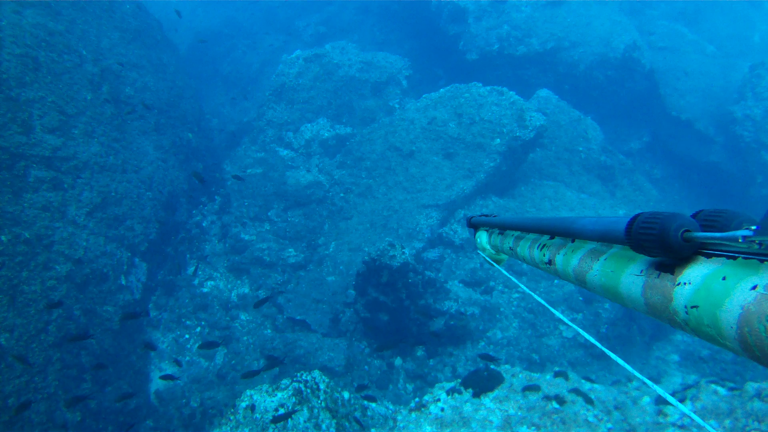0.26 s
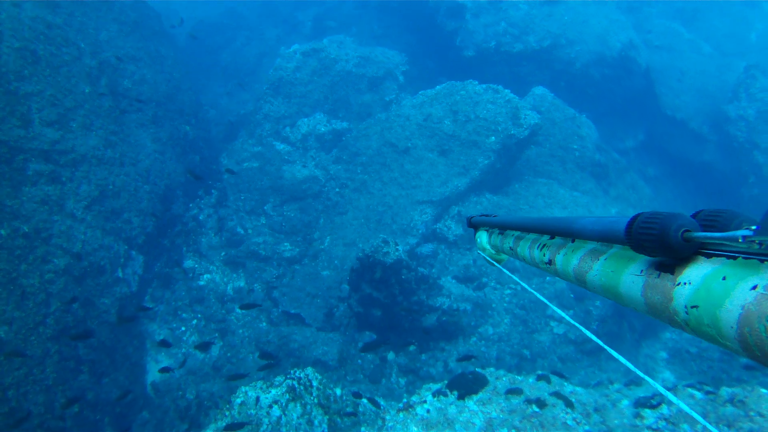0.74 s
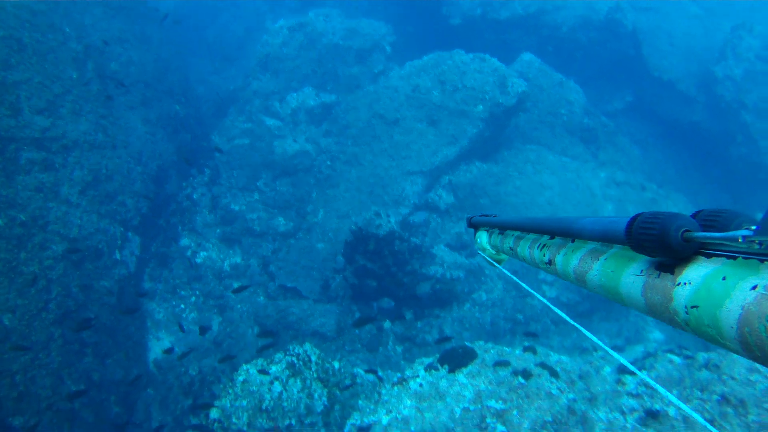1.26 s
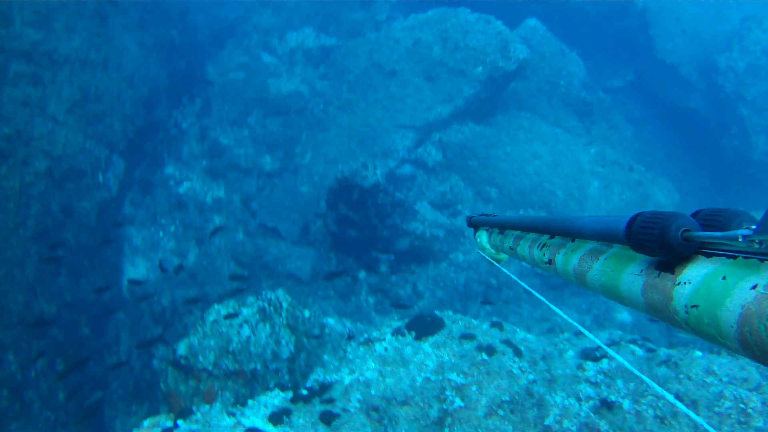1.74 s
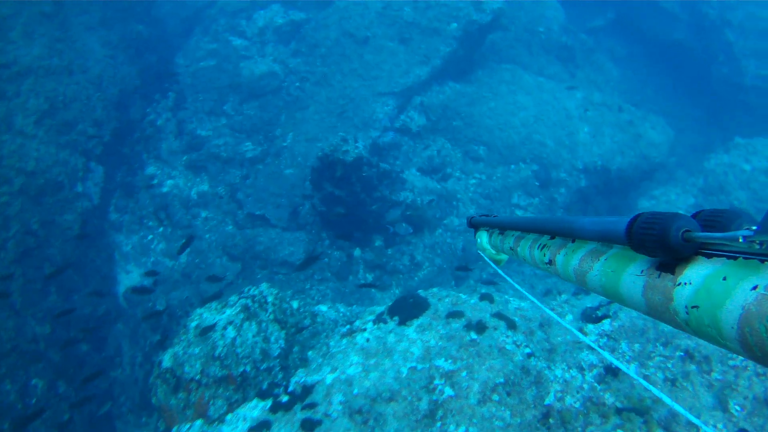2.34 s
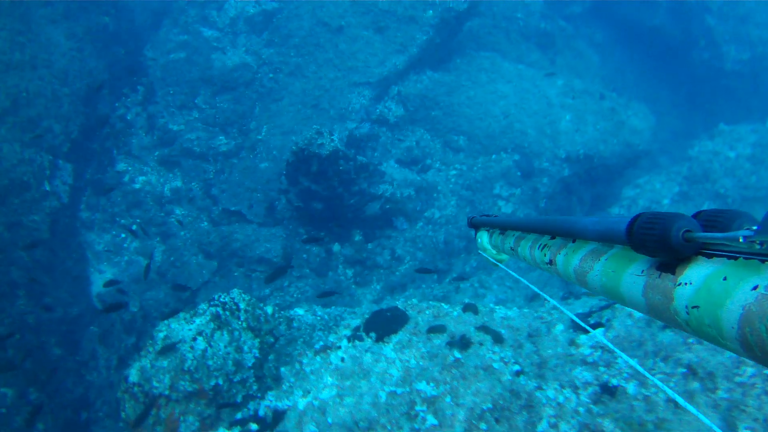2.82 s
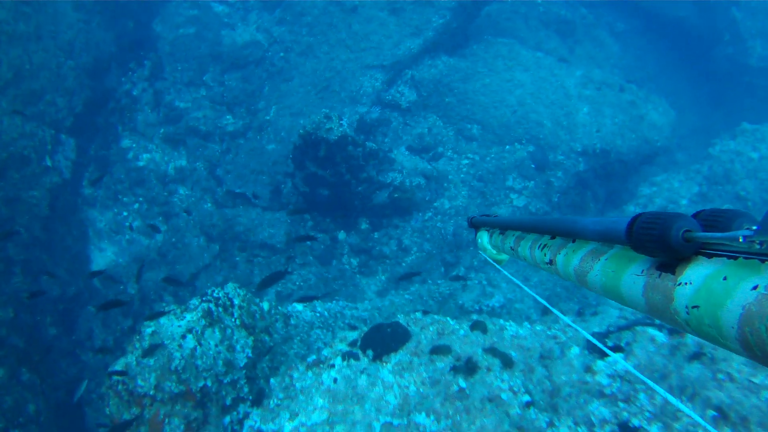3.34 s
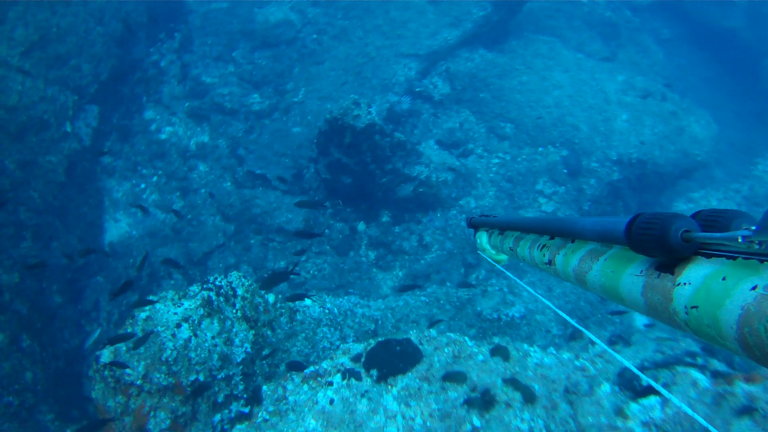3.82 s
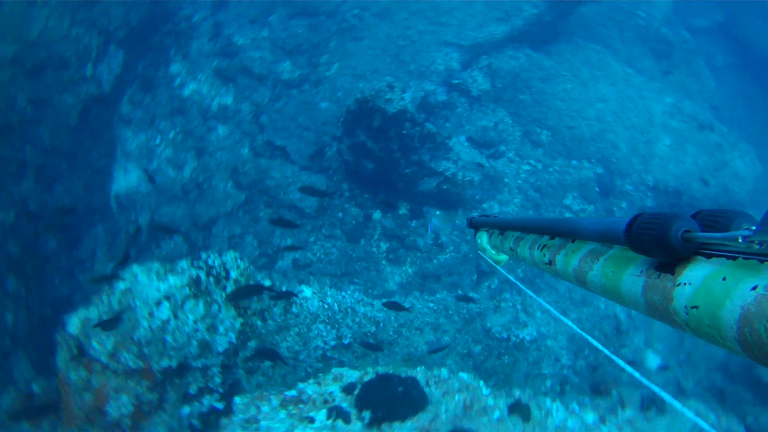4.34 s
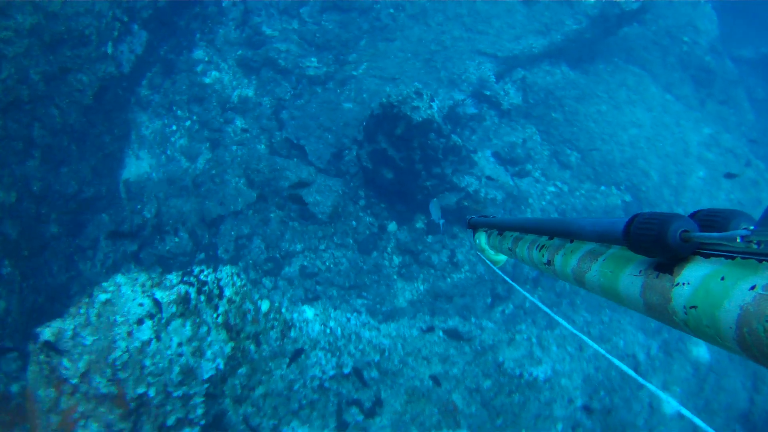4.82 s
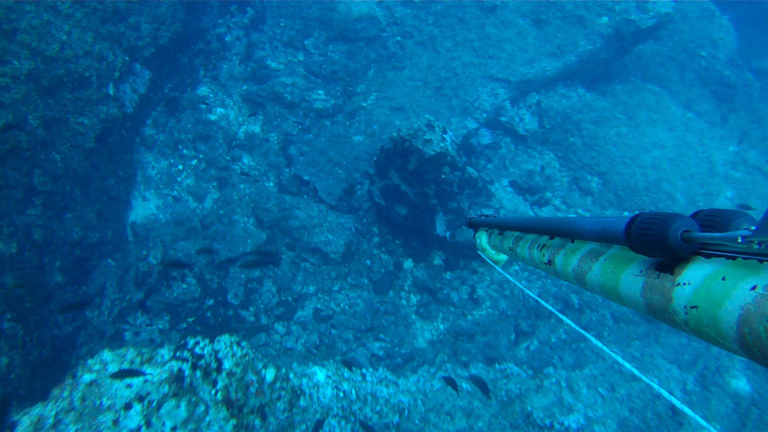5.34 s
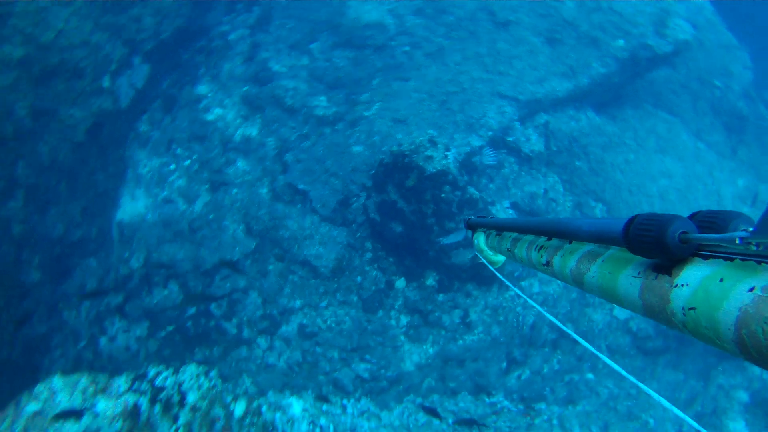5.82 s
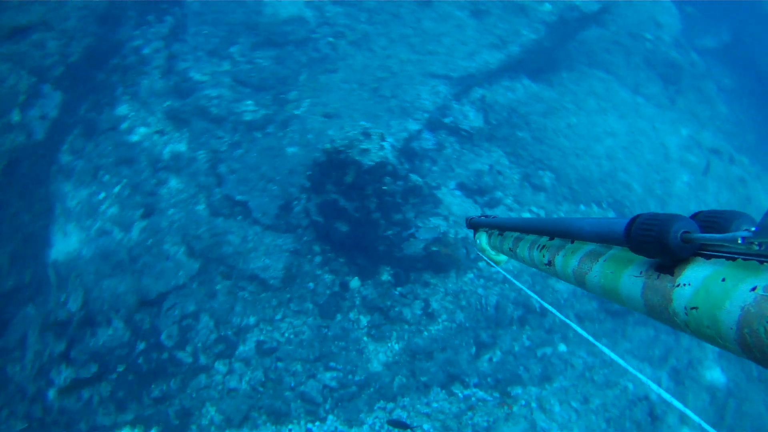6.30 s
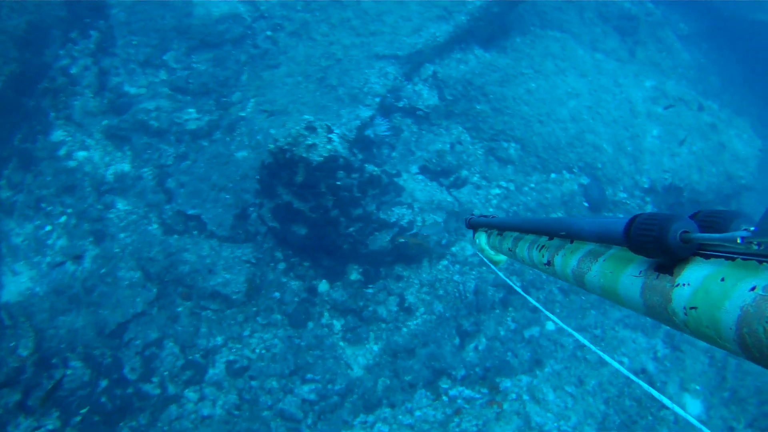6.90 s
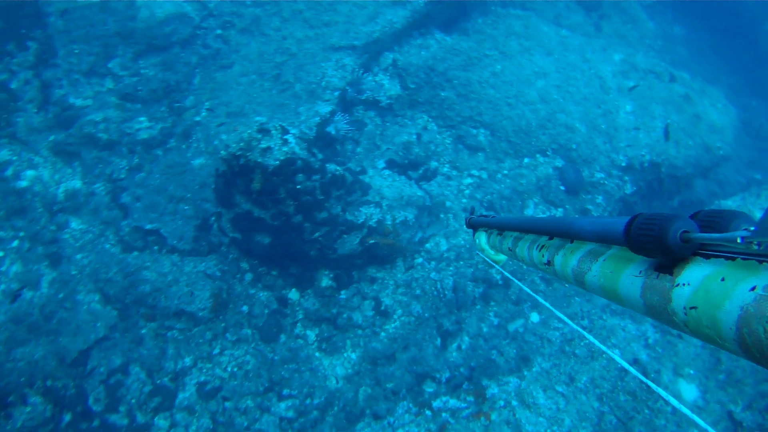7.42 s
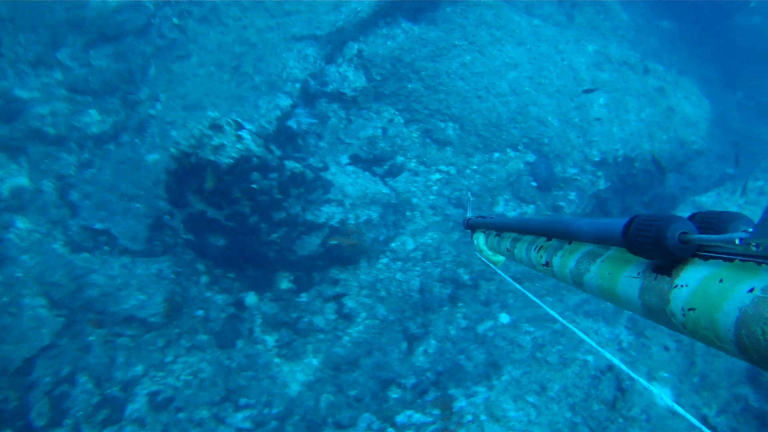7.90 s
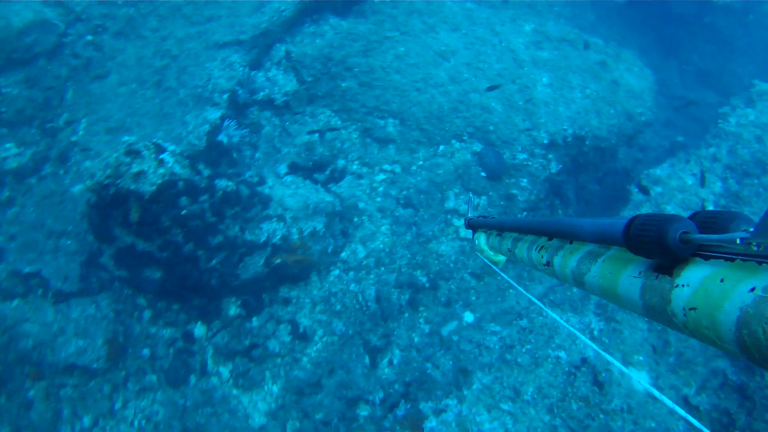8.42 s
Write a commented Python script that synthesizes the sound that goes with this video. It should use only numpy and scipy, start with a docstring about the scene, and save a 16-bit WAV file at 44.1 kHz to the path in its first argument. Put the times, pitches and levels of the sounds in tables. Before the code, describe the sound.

Underwater by a rocky reef, heard through a camera's sealed housing: faint hiss, midrange wash, soft rumble and constant fine shrimp crackle. Sharp near snaps tick irregularly, with a strong one half a second in. Gear knocks and rubs lightly as water stirs. At 5.5 seconds a very loud, short, distorted crack hits, drops out for an instant, then short creaks and more snaps follow.

```python
"""Snapping shrimp on a rocky reef

Under water, with a camera's microphone in a sealed housing. Shrimp snap near and far, ringing modes of the housing.
The diver's gear knocks, creaks and rubs against it: clicks, uneven slips and dense grains ring its lower modes.
One hard blow, stepped pressure and ringing, overloads the input, which all but falls silent for a moment.
Behind lie shaped noise for the sea's hiss, its midrange wash and a slow rumble of moving water, and a wavering hum.
"""
import sys
import numpy as np
from scipy import signal
from scipy.fft import rfft, irfft
from scipy.io import wavfile

SR = 44100
rng = np.random.default_rng(int(sys.argv[2]) if len(sys.argv) > 2 else 0)


def wrap_up_sound(samples):
    """Save the sound to the file named by the first command line argument, as 16-bit audio."""
    columns = np.atleast_2d(samples).T
    # keep every value between -1 and 1, then stretch to whole-number steps
    tamed = np.clip(columns, -1, 1)
    steps = np.round(tamed * 32767).astype(np.int16)
    wavfile.write(sys.argv[1], SR, steps)


N = 381906   # length in samples

# Near claw snaps, drive of each set of modes: (time [s], shell level [dB], port level [dB])
NEAR_SNAPS = [(0.2538, -66, -42), (0.5143, -19, -44), (0.5172, -26, -27.5), (0.5349, -43, -42),
              (0.683, -44.5, -50), (0.725, -63, -39.5), (0.9673, -42, -46), (1.1966, -38.5, -43.5),
              (1.327, -48.5, -54), (1.6357, -46, -42), (1.6735, -35.5, -56), (1.695, -43.5, -38),
              (1.7982, -64, -39.5), (1.9446, -45, -46.5), (1.973, -47, -44), (2.041, -43.5, -43),
              (2.1388, -30.5, -40), (2.3309, -46, -45), (2.4363, -45, -66), (2.6197, -32.5, -58),
              (2.6503, -48, -66), (2.784, -65, -40), (3.0079, -37.5, -34.5), (3.1192, -64, -38),
              (3.1707, -52, -33.5), (3.6969, -48, -37.5), (3.7278, -42, -52), (3.9183, -40, -41.5),
              (3.9462, -23.5, -30), (4.902, -39, -50), (4.9994, -40.5, -41), (5.3397, -45, -34),
              (5.4109, -39, -45), (5.4527, -38, -30), (5.5864, -46, -36), (5.5956, -28.5, -43),
              (5.9876, -36.5, -33), (6.0873, -47, -36.5), (6.604, -58, -37.5), (6.631, -44, -39),
              (6.8709, -28.5, -36), (6.945, -40.5, -40.5), (7.101, -48.5, -40), (7.1826, -43.5, -43),
              (7.3648, -42, -33.5), (7.4402, -55, -39), (7.4961, -37.5, -34), (7.7196, -36, -24.5),
              (7.8308, -41.5, -57), (8.0707, -32, -41), (8.1608, -47, -29.5), (8.321, -56, -38),
              (8.4521, -37.5, -62), (8.6241, -29, -21.5)]
# Ringing modes of the housing shell: (frequency [Hz], level [dB], t60 [s])
SHELL_MODES = [(1187, -7, 0.01), (1816, -15.5, 0.023), (2330, -5, 0.0074), (3040, -3, 0.0044),
               (3766, -7, 0.0075), (4670, -17.5, 0.015)]
# Ringing modes of the lens port: (frequency [Hz], level [dB], t60 [s])
PORT_MODES = [(6360, -15, 0.0032), (7250, -3.5, 0.0039), (7880, -11, 0.0069), (8840, -2.5, 0.0011),
              (11200, -11, 0.0018), (14000, -7.5, 0.0027)]


def near_shrimp():
    """Claw snaps close by ring the housing shell and the lens port."""
    times, shell_db, port_db = np.transpose(NEAR_SNAPS)
    shell = strike(times, shell_db, SHELL_MODES, echo_db=-7.0, echo_s=0.0052, spread_db=4.0)
    port = strike(times, port_db, PORT_MODES, echo_db=-8.5, echo_s=0.006, spread_db=5.5)
    shell = band(band(shell, 870, 8500), 870, 8500)   # twice, for steeper edges
    return shell + band(port, 2450, 9700)


BLOW_S = 5.5019   # when the blow lands
# Modes the blow sets ringing: (frequency [Hz], level [dB], t60 [s])
BLOW_MODES = [(315, -29, 0.17), (658, 5.5, 0.013), (1200, -4.5, 0.023), (1390, -6, 0.015), (2210, -15, .01),
              (3220, -12.5, 0.014), (3890, -12.5, 0.012), (5750, -17.5, 0.0136), (7400, -14, 0.0082)]


def blow():
    """Sudden pressure steps that spring back; with the first rebound the housing rings, and a late bounce follows."""
    steps, hit = np.zeros((2, N))
    for lag_s, size in [(0, -1.3), (0.0011, -1.4), (0.0017, -0.6)]:
        steps[round((BLOW_S + lag_s) * SR):] += size
    springing_back = signal.sosfilt(signal.butter(2, 330, "high", fs=SR, output="sos"), steps)
    hit[round((BLOW_S + 0.00105) * SR)] = 1
    late_hit = np.roll(hit, round(0.0157 * SR))
    bounce = -from_db(-27) * soften(late_hit, contact_s=0.0008)
    ringing = sum(from_db(db) * ring(hit + bounce, hz, t60) for hz, db, t60 in BLOW_MODES)
    return springing_back + ringing


# Gear knocking the housing, drive of each set of modes: (time [s], low level [dB], upper level [dB])
GEAR_KNOCKS = [(1.7028, -55, -45.5), (1.8223, -49, -41), (2.001, -52, -42.5), (2.1212, -42.5, -40.5),
               (2.385, -50, -67), (2.7393, -59, -38.5), (2.8322, -43, -70), (3.3369, -49.5, -42.5),
               (4.2785, -47, -41), (4.4717, -61, -40), (4.699, -49, -60), (4.7363, -43, -46.5),
               (4.8785, -38.5, -40), (4.9041, -43, -28.5), (5.012, -39.5, -67), (5.6712, -44, -36),
               (5.786, -31.5, -58), (5.8389, -41, -30.5), (6.0674, -38.5, -36), (6.3283, -68, -33.5),
               (6.3904, -43, -34.5), (6.4502, -62, -41), (6.5348, -72, -42), (7.7807, -34, -37),
               (7.797, -36.5, -39.5), (7.8137, -40, -48), (7.828, -38.5, -37), (7.856, -37.5, -29),
               (7.885, -34, -40.5), (7.937, -40, -55), (7.949, -37, -55), (8.0217, -54, -37.5),
               (8.048, -59, -41), (8.203, -50, -70)]
# Modes of the housing under knocks, creaks and rubs: (frequency [Hz], level [dB], t60 [s])
BODY_MODES = [(122.6, -13, 0.12), (180, -8.5, 0.072), (336, -7.5, 0.032), (549, -5.5, 0.024),
              (673, -12, 0.048), (1023, -4, 0.012), (1510, -12.5, 0.016)]
SMALL_KNOCK_OVER_STIR_DB = -14   # faint random knocks follow the stirring of the water


def gear(stir_db):
    """Soft knocks on the housing, marked and faint, ring its low and upper body modes."""
    times, low_db, upper_db = np.transpose(GEAR_KNOCKS)
    small_times = rng.uniform(0, N / SR, 40)
    small_db = stir_db[(small_times * SR).astype(int)] + SMALL_KNOCK_OVER_STIR_DB
    small_low_db, small_upper_db = small_db + rng.normal(0, 5.0, (2, len(small_times)))
    times = np.r_[times, small_times]
    low_db = np.r_[low_db, small_low_db]
    upper_db = np.r_[upper_db, small_upper_db + 5]
    low = strike(times, low_db, BODY_MODES[:3], echo_db=-1.0, echo_s=0.00664, spread_db=3.5, count=4)
    upper = strike(times, upper_db, BODY_MODES[3:], echo_db=-2.5, echo_s=0.00431, spread_db=3.5, count=4)
    return band(low, 68, 586) + band(upper, 280, 4100)


# A rubber part creaking on the housing, drive of each pull: (time [s], length [s], level [dB])
CREAK_PULLS = [(5.783, 0.0363, -25), (5.8674, .016, -25), (5.894, .014, -27), (5.9183, .04, -22),
               (5.994, .014, -22.5), (6.0206, .014, -23)]
SLIPS_PER_S, SLIP_JITTER_S = 165, 0.00071
SLIP_FADE_DB = 5.5   # over one pull


def creaks():
    """Stick-slip: each pull is a run of slightly uneven slips that ring the housing briefly."""
    slips = []
    for start_s, length_s, db in CREAK_PULLS:
        for lag_s in np.arange(0, length_s, 1 / SLIPS_PER_S):
            slips.append((start_s + lag_s, db - SLIP_FADE_DB * lag_s / length_s))
    times, levels_db = np.transpose(slips)
    times = times + SLIP_JITTER_S * rng.standard_normal(len(times))
    clicks = np.zeros(N)
    clicks[(times * SR).astype(int)] = from_db(levels_db + rng.normal(0, 1.3, len(times)))
    pushes = soften(clicks, contact_s=0.00082)
    modes = [BODY_MODES[2]] + BODY_MODES[4:6]
    ringing = sum(from_db(db) * ring(pushes, hz, 0.6 * t60) for hz, db, t60 in modes)   # shortened
    return band(ringing, 340, 1230)


# Soft rubbing on the housing, height of each stroke: (time [s], length [s], level [dB])
RUB_STROKES = [(1.498, 0.17, -61), (3.248, .35, -63), (4.407, 0.16, -55), (7.777, 0.18, -57)]


def rubs():
    """Dense uneven grains under a smooth stroke, heard through the middle modes of the housing."""
    t = np.arange(N) / SR
    stroke = np.zeros(N)
    for start_s, length_s, db in RUB_STROKES:
        stroke += from_db(db) * np.sin(np.pi * np.clip((t - start_s) / length_s, 0, 1))
    grains = (rng.random(N) < 400 / SR) * rng.standard_normal(N)   # about 400 a second
    ringing = sum(from_db(db) * ring(grains, hz, t60) for hz, db, t60 in BODY_MODES[2:6])
    return stroke * rms_one(band(ringing, 400, 1160))


def far_shrimp(hiss_db):
    """A random crackle of many faint distant snaps, few of them strong, following the sea hiss."""
    times = rng.uniform(0, N / SR, 900)
    size_db = hiss_db[(times * SR).astype(int)] + 5 * np.minimum(rng.exponential(1, len(times)), 3.2)
    shell_db = size_db - 4.0 + rng.normal(0, 3.9, len(times))
    shell = strike(times, shell_db, SHELL_MODES, echo_db=-4.0, echo_s=0.0049, spread_db=0.0, count=3)
    port = strike(times, size_db - 0.5, PORT_MODES, echo_db=-1.5, echo_s=0.0015, spread_db=4.0, count=3)
    return band(shell, 1000, 7100) + band(port, 4300, 20000)


# Spectrum of the sea hiss: (frequency [Hz], relative level per Hz [dB])
HISS_SPECTRUM = [(900, -34.5), (1300, -6.5), (2200, -4.5), (5260, -11.5), (7280, -12.5), (14400, -16.5)]
# Spectrum of the midrange wash: (frequency [Hz], relative level per Hz [dB])
WASH_SPECTRUM = [(71, -46.5), (120, -14.5), (409, -9.5), (796, -11.5), (884, -6.5), (1060, -5.5),
                 (1130, -3.5), (1360, -14), (1500, -14.5), (1950, -29), (3300, -120)]
# Spectrum of the rumble of moving water: (frequency [Hz], relative level per Hz [dB])
RUMBLE_SPECTRUM = [(20, 11), (50, -9.5), (110, -26.5), (200, -49.5)]
HISS_TOP_HZ = 15350
WASH_OVER_HISS_DB, WASH_FOLLOWS_STIR = 2.5, 0.195   # offset; share of the stirring's dB swing


def sea(hiss_db, stir_db):
    """Three shaped noises: hiss, a wash riding on it with a share of the stirring, and the rumble of stirred water."""
    low_pass = signal.cheby2(12, 50, HISS_TOP_HZ, fs=SR, output="sos")
    hiss = signal.sosfilt(low_pass, coloured(HISS_SPECTRUM, patchy_db=0.6))
    wash_db = hiss_db + WASH_OVER_HISS_DB + WASH_FOLLOWS_STIR * (stir_db - stir_db.mean())
    wash = coloured(WASH_SPECTRUM, patchy_db=1.06)
    rumble = coloured(RUMBLE_SPECTRUM, patchy_db=2.5)
    return from_db(hiss_db) * hiss + from_db(wash_db) * wash + from_db(stir_db) * rumble


# Course of the faint hum, before its quick wavering: (time [s], level [dB])
HUM_LEVEL = [(0, -74), (0.4, -62), (1.15, -66.5), (1.4, -85), (2.2, -67), (2.9, -59.5), (3.3, -64.5),
             (3.75, -56.5), (4.02, -66.5), (4.25, -53), (4.42, -68.5), (4.8, -59.5), (5.5, -74), (6.1, -59),
             (6.7, -82.5), (7.25, -59), (7.7, -77), (8.3, -58.5), (8.66, -85)]
HUM_HZ = 1134   # centre of the wavering pitch


def hum():
    """A thin sine tone whose pitch and strength waver."""
    level_db, = in_time(HUM_LEVEL)
    pitch_hz = HUM_HZ + 3 * drift(2.5) + 3 * drift(15)
    phase = 2 * np.pi * np.cumsum(pitch_hz) / SR
    return np.sqrt(2) * from_db(level_db + 1.5 * drift(10)) * np.sin(phase)   # root 2: levels are rms


def strike(times, levels_db, modes, echo_db, echo_s, spread_db, count=16):
    """Each event is a click and a dying scatter of echoes; every mode takes them with strengths of its own."""
    lags = np.c_[np.zeros(len(times)), rng.exponential(echo_s, (len(times), count))]
    # early echoes fade fast, late ones linger
    fade_db = np.where(lags > 0, echo_db - 9 * np.sqrt(lags / echo_s), 0)
    at = np.minimum(((times[:, None] + lags) * SR).astype(int), N - 1)
    push = rng.choice([-1, 1], len(times))   # the first click drives all modes the same way, echoes do not
    out = np.zeros(N)
    for hz, level_db, t60 in modes:
        scatter_db = spread_db * rng.standard_normal(at.shape)
        sizes = from_db(levels_db[:, None] + level_db + fade_db + scatter_db)
        signs = np.where(lags > 0, rng.choice([-1, 1], at.shape), push[:, None])
        clicks = np.bincount(at.ravel(), (sizes * signs).ravel(), N)
        out += ring(clicks, hz, t60)
    return out


def ring(clicks, hz, t60):
    """A damped resonator: a unit click sets a sine of height 1 ringing, 60 dB down after t60 seconds."""
    r, w = from_db(-60 / (t60 * SR)), 2 * np.pi * hz / SR
    return signal.lfilter([0, np.sin(w)], [1, -2 * r * np.cos(w), r * r], clicks + 1e-18)


def soften(x, contact_s):
    """A soft contact spreads each push over its contact time."""
    push = np.hanning(round(contact_s * SR))
    return signal.lfilter(push / push.sum(), 1, x)


# Left-right difference added to the noises: (frequency [Hz], level of the difference relative to centre [dB])
SIDE_LEVEL = [(40, -39.5), (400, -16), (1300, -26), (5000, -6.5), (12000, -6)]


def coloured(spectrum, patchy_db):
    """Stereo noise of a given spectrum, flickering a little: a common part, plus a part opposite left and right; rms 1."""
    hz = np.maximum(np.fft.rfftfreq(N, 1 / SR), 1)
    shape = from_db(at_hz(spectrum, hz)) * (hz > 15)
    mid, side = rfft(rng.standard_normal((2, N))) * shape
    mid = irfft(mid, N)
    side = irfft(side * from_db(at_hz(SIDE_LEVEL, hz)), N)
    return rms_one(from_db(patchy_db * drift(12)) * (mid + side * [[1], [-1]]))


def drift(rate):
    """Slow random wandering of rms 1, faster for a higher rate."""
    step = 40   # samples between computed points
    r = np.exp(-2 * np.pi * rate * step / SR)
    noise = rng.standard_normal(N // step + 2002)
    slow = signal.lfilter([1], [1, -2 * r, r * r], noise)[2000:]   # drop the settling
    return np.interp(np.arange(N) / step, np.arange(len(slow)), rms_one(slow))


def band(x, low_hz, high_hz):
    """Keep the band between two frequencies."""
    return signal.sosfilt(signal.butter(2, [low_hz, high_hz], "band", fs=SR, output="sos"), x)


def from_db(db):
    """Decibels to amplitude."""
    return 10 ** (np.asarray(db) / 20)


def rms_one(x):
    """Scale to rms 1."""
    return x / np.sqrt(np.mean(x ** 2) + 1e-20)


def in_time(rows):
    """Draw each column of a table over time, sample by sample."""
    s, *columns = np.transpose(rows)
    return [np.interp(np.arange(N) / SR, s, c) for c in columns]


def at_hz(points, hz):
    """Read a spectrum table on a logarithmic frequency scale."""
    table_hz, level_db = np.transpose(points)
    return np.interp(np.log(hz), np.log(table_hz), level_db)


# Course of the sea hiss: (time [s], level [dB])
HISS_LEVEL = [(0, -64.5), (1.2, -64), (2.8, -65), (3.4, -60.5), (8.66, -61)]
# Water stirring round the housing, as the course of its rumble: (time [s], level [dB])
STIR_LEVEL = [(0, -55), (1.2, -55), (1.45, -46.5), (2.9, -44.5), (3.3, -38.5), (4.1, -46), (4.8, -41.5),
              (6.0, -39), (7.0, -44.5), (7.65, -49), (7.9, -36.5), (8.66, -40)]


def scene():
    """Everything reaching the microphone, from the nearest snaps to the hum."""
    hiss_db, = in_time(HISS_LEVEL)
    stir_db, = in_time(STIR_LEVEL)
    on_housing = near_shrimp() + blow() + gear(stir_db) + creaks() + rubs()
    return on_housing + far_shrimp(hiss_db) + sea(hiss_db, stir_db) + hum()


# The silence after an overload: (begins [s], ends [s]), both counted from the overload
MUTE_SPAN = (.0054, .0142)
TURN_DOWN_DB, HOLD_S, RECOVER_S = -4.5, 0.79, 0.23   # gain after an overload; hold counts from it
CUTOFF_HZ = 16500


def record(dry):
    """The input clips; its first overload mutes it briefly, then lowers the gain; lows and highs are cut."""
    since = (np.arange(N) - np.argmax(np.abs(dry[0]) > 0.25)) / SR   # seconds from the overload
    mute_from, mute_to = MUTE_SPAN
    blocked_db = np.interp(since, [mute_from - 0.0004, mute_from, mute_to, mute_to + 0.002], [0, -50, -50, 0])
    recovery = np.clip(1 - (since - HOLD_S) / RECOVER_S, 0, 1)
    lowered_db = TURN_DOWN_DB * (since > mute_from) * recovery
    clipped = np.clip(dry, -0.9, 0.97)
    # the coupling capacitor
    coupled = signal.sosfilt(signal.butter(2, 95, "high", fs=SR, output="sos"), clipped)
    low_pass = signal.cheby2(12, 60, CUTOFF_HZ, fs=SR, output="sos")
    return signal.sosfilt(low_pass, coupled * from_db(blocked_db + lowered_db))


dry = scene()
out = record(dry)
wrap_up_sound(out)
```